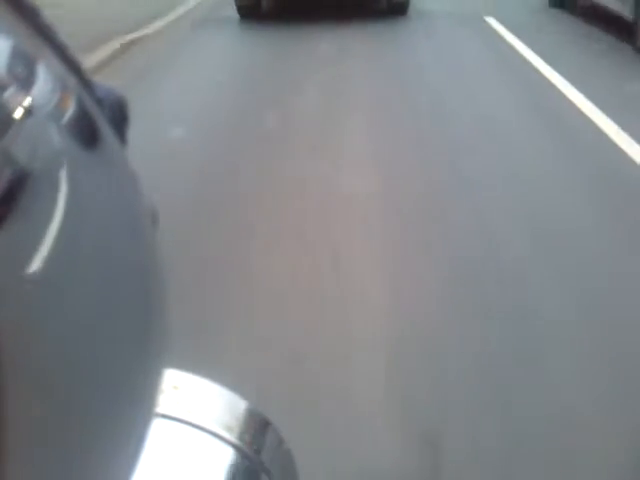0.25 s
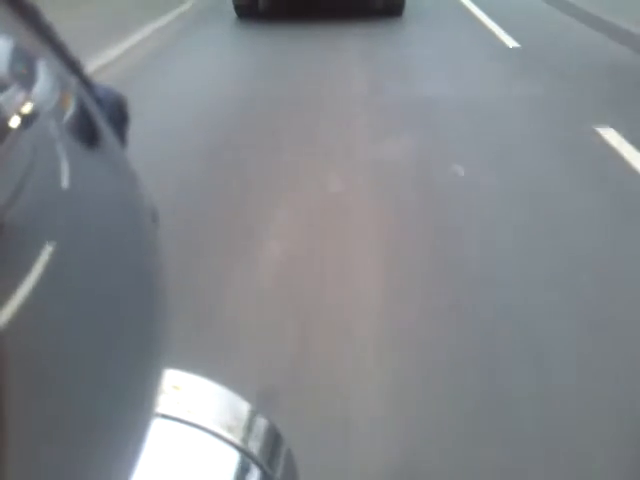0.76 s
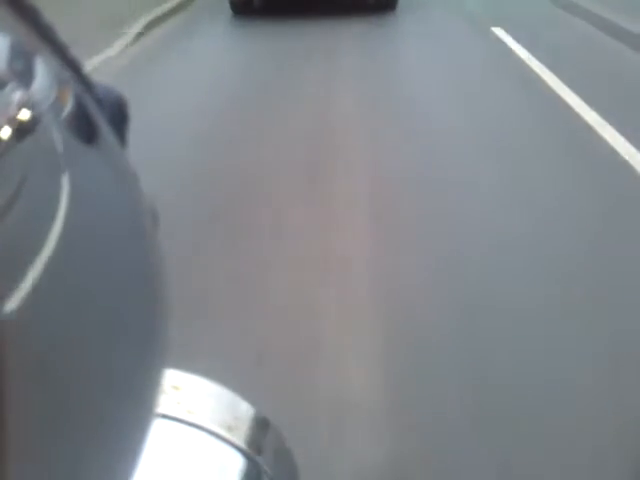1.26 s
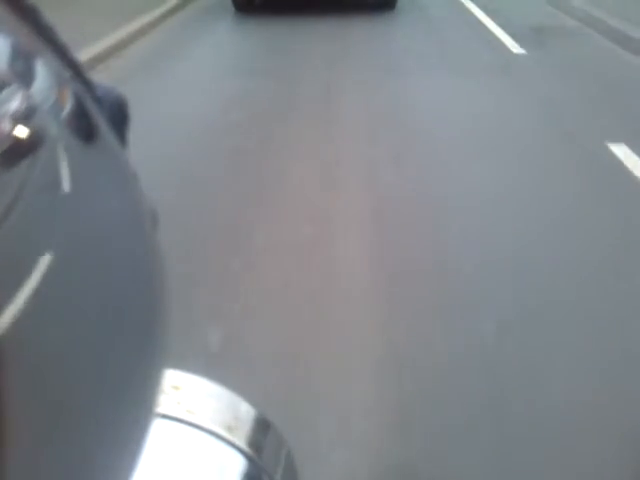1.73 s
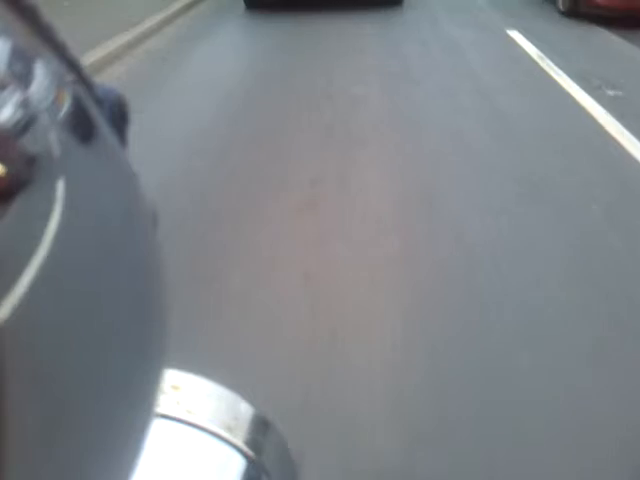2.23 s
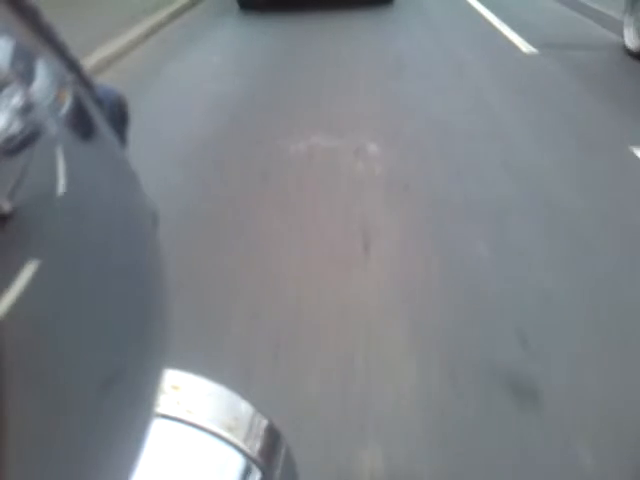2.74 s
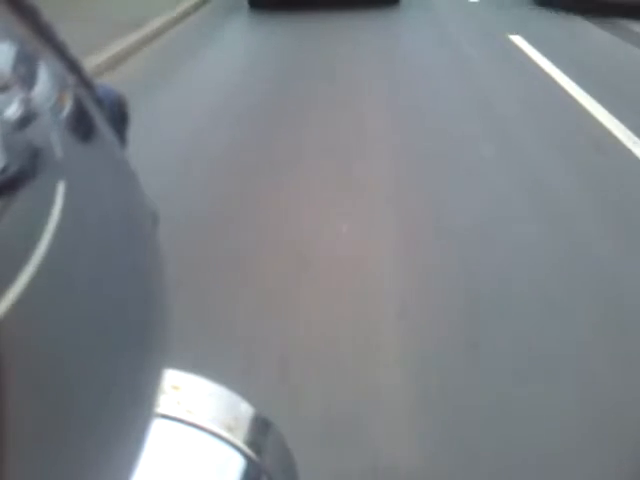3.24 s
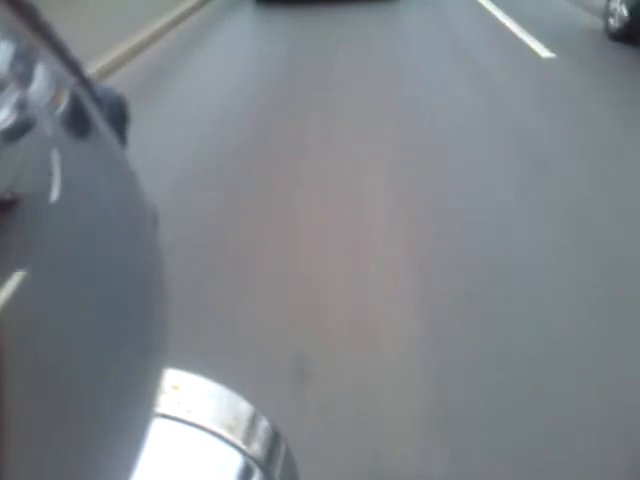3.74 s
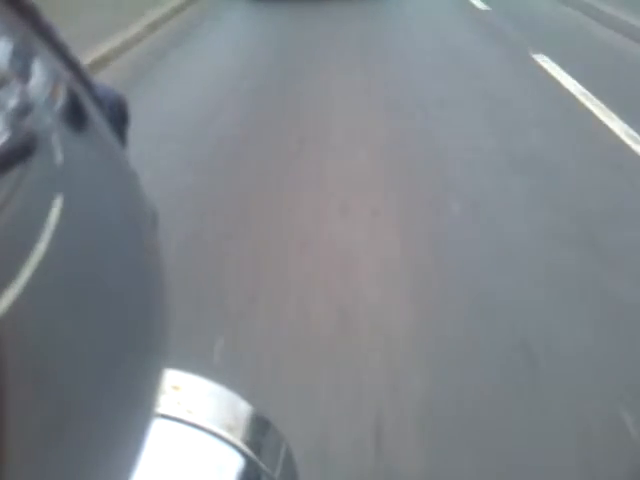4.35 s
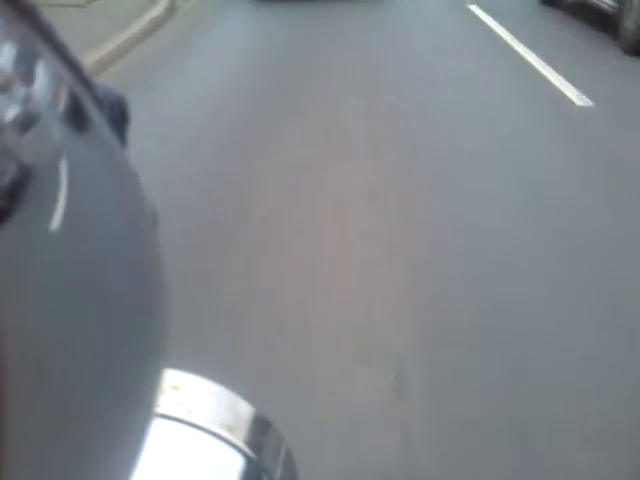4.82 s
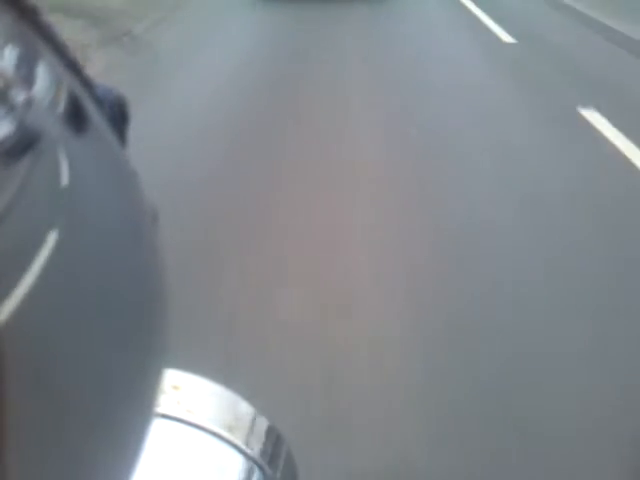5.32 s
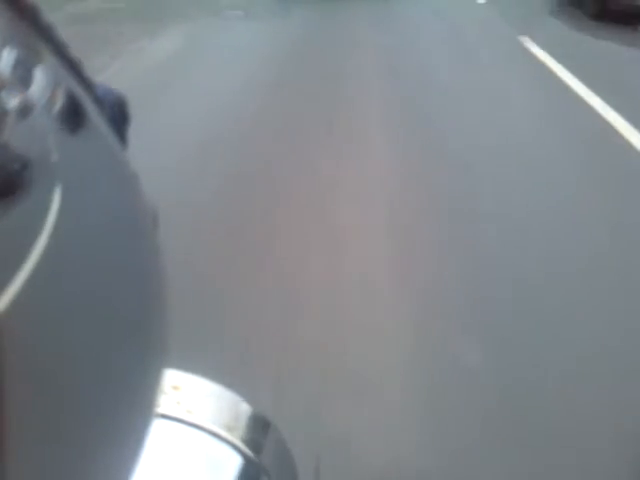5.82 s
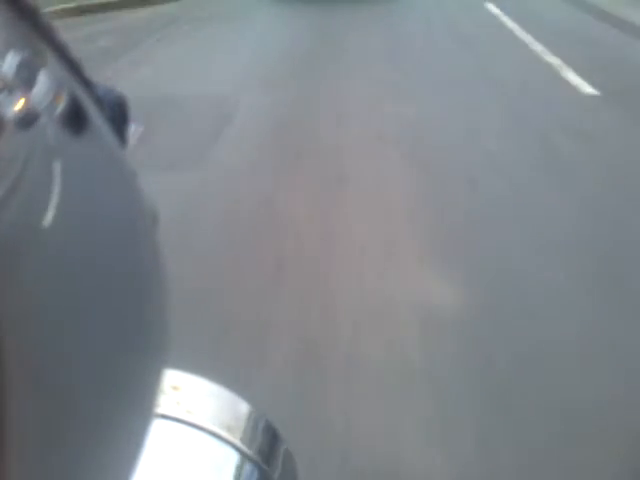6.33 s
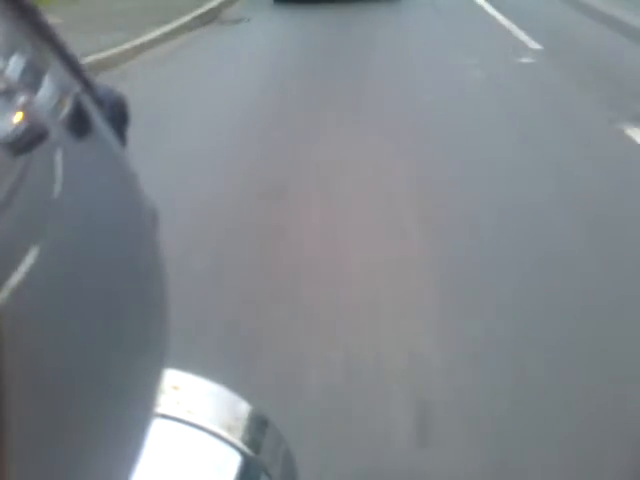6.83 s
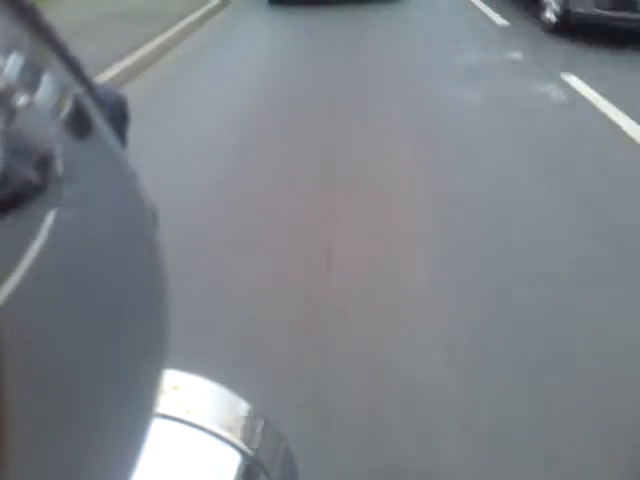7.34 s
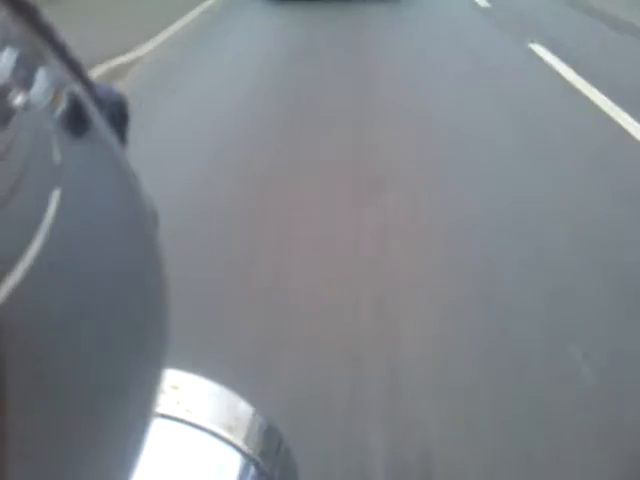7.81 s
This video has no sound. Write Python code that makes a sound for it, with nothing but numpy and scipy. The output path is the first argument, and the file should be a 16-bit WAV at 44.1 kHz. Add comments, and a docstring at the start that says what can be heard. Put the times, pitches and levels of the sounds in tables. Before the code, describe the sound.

On board a motorcycle on a road, a low uneven engine burble rolls along with mechanical clatter and a faint metallic jingle. After about four seconds the throttle opens, the drone smooths and climbs, a gear whine rises with it, and wind increasingly buffets the close microphone, with thumps, knocks and gritty overload near the end.

```python
"""On board a motorcycle

A motorcycle rolls along a road on a light throttle, then pulls harder and gains speed, heard from the bike itself.
Close by, crank orders drone and throb through the exhaust pipe, and a gear whine climbs with the crank.
Filtered noise makes the engine clatter, and short gritty ticks once a turn, as of overload near the waveform's
peaks; decaying sines make a loose metal part jingle. Wind noise buffets the microphone more as the speed rises,
with thumps and knocks; the loudest peaks overload it."""
import sys
import numpy as np
from scipy import signal
from scipy.fft import rfft, irfft, next_fast_len
from scipy.io import wavfile

SR = 44100
rng = np.random.default_rng(int(sys.argv[2]) if len(sys.argv) > 2 else 0)


def file_out(sig):
    """Save sig as 16-bit WAV at sys.argv[1]."""
    # one column per channel
    cols = np.atleast_2d(sig).T
    # limit, then scale
    lim = np.clip(cols, -1, 1)
    pcm = np.round(lim * 32767).astype(np.int16)
    wavfile.write(sys.argv[1], SR, pcm)


N = 355887
TIME = np.arange(N) / SR  # seconds

# Wind at the microphone, growing with speed.
# Each row: crank speed in turns per s, buffeting level in dB, rush level in dB (both before a trim).
WIND_BY_SPEED = [(48.3, -29.5, -42.5), (64.4, -27.5, -42), (81.9, -20.5, -34), (92, -21.5, -38)]
# Gusts. Each row: centre in seconds, half length in seconds, added buffeting in dB, added rush in dB.
GUSTS = [(5.89, 0.12, 6.5, -3), (6.26, 0.056, 8.5, 2.5), (6.41, 0.094, 5.5, 4.5), (6.85, 0.087, 5, 2.5),
         (7.04, 0.084, 7, 8), (7.39, 0.046, 2, 1), (7.6, 0.033, 5, 3), (7.84, 0.062, 7, 4),
         (7.99, 0.044, 2.5, 2)]
# Spectrum of the low buffeting. Each row: frequency in Hz, relative level in dB.
BUFFET_COLOUR = [(12, -17), (28, -10.5), (50, -0.5), (100, 2), (200, 0), (320, -3), (500, -7.5), (800, -14),
                 (1400, -27), (2500, -36.5), (5000, -56.5), (12000, -67)]
# Spectrum of the brighter rush. Each row: frequency in Hz, relative level in dB.
RUSH_COLOUR = [(200, -11), (600, 12.5), (1300, 4), (2000, 0.5), (3000, -5.5), (4000, -14.5), (5000, -24.5),
               (8000, -31), (15000, -50)]
# Jolts and wind thumps. Each row: start in seconds, relative level in dB, pitch in Hz.
THUMPS = [(0.905, -22, 257), (1.36, -10, 245), (1.498, -9, 240), (2.331, -11, 241.7), (2.539, -10.5, 390),
          (2.758, -3, 241.8), (2.772, -7, 467.6), (2.815, -15, 315), (6.974, 0, 263.7), (7.157, 0, 455),
          (7.422, -13, 334), (7.835, -2, 329.2), (7.876, -10, 279.5)]
# Short knocks. Each row: start in seconds, relative level in dB, pitch in Hz.
KNOCKS = [(6.2287, -9, 1203), (6.2613, -20, 1330), (6.3031, -8.5, 1330), (6.4582, -22, 1700),
          (6.973, -9, 1354), (7.017, -17, 1324), (7.0305, -14, 1200), (7.085, -19, 1280),
          (7.1287, -13, 1330), (7.1584, -17.5, 1220), (7.364, -13.5, 1340), (7.735, -20, 1669),
          (7.838, -14, 1270), (7.8774, -21, 1410), (7.98, -16, 1741)]

# Ringing modes of the loose part. Each row: pitch in Hz, relative level in dB, time to fall 60 dB in seconds.
JINGLE_MODES = [(6860, 6, 0.0059), (7500, 0, 0.02), (7750, 6.5, .008), (8540, 4.5, .006),
                (8960, 6.5, 0.007), (10460, -4, .018), (11150, -2, 0.014), (12590, -6, 0.03)]
# Bumps that shake it harder. Each row: centre in seconds, half length in seconds, added level in dB.
JINGLE_BURSTS = [(.03, 0.067, 13), (1.12, 0.027, 4), (2.18, .12, 3.5), (3.2, .3, 3), (3.61, .02, 6),
                 (3.75, 0.031, 10)]
# Spectrum of the sharp overload ticks. Each row: frequency in Hz, relative level in dB.
TICK_COLOUR = [(1000, -4), (3200, 6.5), (5000, -3), (6400, 7), (7200, -15), (7800, 2.5), (8500, -4.5),
               (9700, 2.5), (11000, -14), (15500, -20)]
# Spectrum of the engine clatter and tyre noise. Each row: frequency in Hz, relative level in dB.
CLATTER_COLOUR = [(150, 1), (380, 4.5), (520, -13.5), (700, -3.5), (1050, 1.5), (1600, -5.5), (2100, -14.5),
                  (2800, -13.5), (3600, -18), (4300, -27), (4900, -34), (6100, -32.5), (9500, -33.5),
                  (12000, -38.5), (15500, -45)]
# Resonances of the engine casing. Each row: pitch in Hz, nominal width in Hz, relative level in dB.
CASING = [(683, 29, 4.5), (1267, 73, 2.5), (1341.5, 89, 4), (4220, 160, -23.5)]
# Strength of the gear whine. Each row: time in seconds, level in dB.
WHINE = [(0, -62), (3.3, -45), (4.3, -46.5), (4.9, -41.5), (6.9, -40.5), (7.25, -49), (8.07, -59)]
# Brief flares of the whine. Each row: centre in seconds, half length in seconds, added level in dB.
WHINE_FLARES = [(3.79, .08, 2.5)]

# The rider's hand. Each row: time in seconds, throttle opening 0-1.
THROTTLE = [(0, 0), (.75, 0), (1.3, .2), (2.2, 0.1), (3.7, 0.27), (4.25, 0.5), (5, 0.68), (6.3, .98),
            (7.1, 1), (8.07, 0.63)]
# Crank speed. Each row: time in seconds, turns per s.
SPEED = [(0, 51.2), (.55, 50.4), (.9, 54), (1.55, 57.2), (2.3, 55.4), (3, 54.8), (4, 58.4), (4.9, 63),
         (5.5, 67.5), (6, 72.8), (6.5, 79.6), (7, 87.6), (7.35, 91.2), (7.8, 92), (8.07, 88.6)]
# How firings even out as the throttle opens. Each row: throttle opening 0-1, unevenness 0-1.
UNEVEN = [(.25, 0.83), (.55, .14)]
# Pipe modes rung by uneven firings, a low burble and a hollow ring.
# Each row: pitch in Hz, width in Hz, level in dB, dB added at full throttle, dB added when coasting.
BURBLE = [(138.8, 62, -24, -13.5, 0), (361.5, 63, -37, 1, 6)]
# Resonances of the exhaust pipe. Each row: frequency in Hz, relative level in dB.
PIPE = [(80, -11), (110, -8), (135, 10), (175, 5), (205, -8), (245, 3), (280, -5), (355, -1.5), (390, -7),
        (420, 4), (452, 4.5), (480, -5), (548, 2.5), (640, -10.5), (900, -15.5)]
# The two lowest crank orders. Each row: dB at closed throttle, dB at full throttle.
DRONE = [(-30.5, -22), (-30, -14)]

# the loose part shakes most near one crank speed (turns per s)
SHAKE_SPEED, SHAKE_SPEED_WIDTH = 55.9, 4.1
JINGLE_DB, JINGLE_SHAKE_DB = -79.5, 16  # far from that speed, and added at it
TICK_DB, TICK_LOAD_DB = -68.5, 5  # at closed throttle, and added at full throttle
# around this crank speed (turns per s) the ticks step up in level
TICK_ONSET_SPEED, TICK_ONSET_WIDTH, TICK_FAST_DB = 74, 1.2, 10
CLATTER_DB, CLATTER_LOAD_DB = -38, 2.5  # before trims: at closed throttle, and added at full throttle
MESH_ORDER = 21.6  # whine cycles per crank turn
WHINE_PEAK_HZ, WHINE_PEAK_WIDTH_HZ, WHINE_PEAK_DB = 1363, 170, 9  # the casing favours this pitch
COAST_BELOW = 0.11  # throttle opening by which coasting has faded to about a third
EXHAUST_DB, EXHAUST_LOAD_DB = -36.5, 11  # before the pipe: at closed throttle, and added at full throttle
BOOM_HZ, BOOM_WIDTH_HZ, BOOM_DB = 75.4, 9.9, 5  # the first order booms as it passes this pitch
EDGE_HZ = 15800  # upper band limit


def amp(db):
    """Decibels to gain."""
    return 10 ** (np.asarray(db) / 20)


def unit(x):
    """Scales to rms 1."""
    return x / np.sqrt(np.mean(x ** 2) + 1e-20)


def curves(rows):
    """Each column of a table after the time, at every sample."""
    s, *columns = np.transpose(rows)
    return [np.interp(TIME, s, column) for column in columns]


def bell(x, centre, width):
    """A smooth hump of height 1."""
    return np.exp(-((x - centre) / width) ** 2)


def swells(rows):
    """Brief humps of level from rows of (s, half length s, dB, ..): one curve for each dB column."""
    return sum(np.outer(dbs, bell(TIME, s, half)) for s, half, *dbs in rows)


def noise():
    """White noise."""
    return rng.standard_normal(N)


def wander(rate_hz):
    """Slow random curve of rms 1, fading out above roughly the given rate."""
    points, points_per_s = 16384, 1500
    f = np.fft.rfftfreq(points, 1 / points_per_s)
    slow = irfft(rfft(rng.standard_normal(points)) * np.exp(-(f / rate_hz) ** 2))
    return unit(np.interp(TIME, np.arange(points) / points_per_s, slow))


def colour(x, points):
    """Filters by a spectrum of (Hz, dB) points; rms 1."""
    hz, db = np.transpose(points)
    size = next_fast_len(N)
    f = np.fft.rfftfreq(size, 1 / SR)
    gain = amp(np.interp(np.log(f + 1), np.log(hz), db))
    return unit(irfft(rfft(x, size) * gain, size)[:N])


def band(x, low_hz, high_hz):
    """A band-pass filter."""
    return signal.sosfilt(signal.butter(2, [low_hz, high_hz], "band", fs=SR, output="sos"), x)


def resonate(x, hz, width):
    """A resonance of gain 1 that can follow a pitch curve: shift down to zero, smooth, shift back."""
    turn = np.exp(2j * np.pi * np.cumsum(hz * np.ones(N)) / SR)
    r = np.exp(-np.pi * width / SR)
    return 2 * (turn * signal.lfilter([1 - r], [1, -r], x / turn)).real


def resonate_twice(x, hz, width):
    """Two equal resonances in a row, for steeper skirts."""
    return resonate(resonate(x, hz, width), hz, width)


def once_a_turn(turns):
    """A unit click at each whole turn."""
    return np.diff(np.floor(turns), prepend=np.floor(turns[0]))


def per_turn(turns):
    """A normal random value held for each turn."""
    return rng.standard_normal(1000)[np.floor(turns).astype(int) % 1000]


def add(mix, s, sound):
    """Mixes a sound in at a time."""
    part = mix[max(round(s * SR), 0):][:len(sound)]
    part += sound[:len(part)]


def unevenness(throttle):
    """How much the firings differ from each other, 0-1."""
    return np.clip(np.interp(throttle, *np.transpose(UNEVEN)), 0, 1)


def coasting(throttle):
    """1 with the throttle shut, falling smoothly towards 0 as it opens."""
    return bell(throttle, 0, COAST_BELOW)


def pipe_level(hz, throttle):
    """Level in dB of an exhaust order: louder with the throttle, coloured by the pipe."""
    return EXHAUST_DB + EXHAUST_LOAD_DB * throttle + np.interp(hz, *np.transpose(PIPE))


def wind(turns, speed, buffet_db=2, rush_db=4, lumps_db=2.0, crackle_db=5.5, throb_db=3.5, onset_db=-43,
         pops=0.36, pops_per_s=110):
    """Eddies buffet the microphone; strong wind tears into a brighter, crackling rush that throbs with the engine."""
    speeds, *steady_db = np.transpose(WIND_BY_SPEED)
    low_db, high_db = [np.interp(speed, speeds, db) for db in steady_db] + swells(GUSTS)
    eddies = wander(60)
    buffet = colour(noise() * amp(lumps_db * eddies), BUFFET_COLOUR)
    grain_db = crackle_db * 2 * np.tanh((.5 * eddies + wander(380)) / 2)
    grain_db = grain_db + throb_db * np.cos(2 * np.pi * (turns + 0.31))
    crackle = unit(np.tanh(noise()) * (rng.random(N) < pops_per_s / SR))
    rush = colour(unit(noise() * amp(grain_db)) + pops * crackle, RUSH_COLOUR)
    # only wind above a threshold tears
    strength = np.sqrt(np.maximum(amp(high_db) ** 2 - amp(onset_db) ** 2, 0))
    return amp(low_db + buffet_db) * buffet + amp(rush_db) * strength * rush


def jolts(thump_db=-3, knock_db=-6, knock_s=0.0011, cycles=0.28):
    """Low thumps are quickly dying sines; short knocks are pulses of band-passed noise."""
    out, t = np.zeros(N), TIME[:SR // 20]
    for s, db, hz in THUMPS:
        u = t * hz / cycles  # the envelope peaks at u = 1
        add(out, s, -amp(db + thump_db) * u * np.exp(1 - u) * np.sin(2 * np.pi * hz * t))
    for s, db, hz in KNOCKS:
        u = t / knock_s
        grit = unit(band(rng.standard_normal(len(t)), hz * 0.61, hz * 1.28))
        add(out, s, amp(db + knock_db) * grit * u * np.exp(1 - u))
    return out


def overload_ticks(turns, speed, throttle, length=0.087, scatter_db=5.0, lead=0.2):
    """A short gritty noise burst once a turn near the waveform's peak, as of overload (length and lead in turns)."""
    fast = 1 / (1 + np.exp((TICK_ONSET_SPEED - speed) / TICK_ONSET_WIDTH))
    db = TICK_DB + TICK_LOAD_DB * throttle + TICK_FAST_DB * fast
    phase = turns + lead
    bursts = np.exp(-(phase % 1) / length) * amp(scatter_db * np.tanh(per_turn(phase)))
    return amp(db) * colour(noise() * bursts, TICK_COLOUR)


def jingle(turns, speed, scatter_db=3, bounce=.5, bounces_per_s=90):
    """Shaken by the crank, the loose part strikes about once a turn and bounces at random, each ring different."""
    shaking = 1 / (1 + ((speed - SHAKE_SPEED) / SHAKE_SPEED_WIDTH) ** 2)
    db = JINGLE_DB + JINGLE_SHAKE_DB * shaking + swells(JINGLE_BURSTS)[0]
    strike_gain = amp(scatter_db * np.clip(per_turn(turns + .5), -2, 2))
    strikes = once_a_turn(turns + 0.071 * wander(40)) * strike_gain  # with uneven timing
    strikes = strikes + bounce * noise() * (rng.random(N) < bounces_per_s / SR)
    t = TIME[:SR // 20]
    attack = 1 - np.exp(-t / .0004)
    ring = np.zeros(N)
    for hz, level, t60 in JINGLE_MODES:
        mode = attack * amp(level - 60 * t / t60) * np.sin(2 * np.pi * hz * t)
        ring += signal.oaconvolve(strikes * (1 + .5 * noise()), mode)[:N]
    return amp(db) * unit(ring)


def clatter(turns, throttle, throb=0.13, flutter_db=0.97, body_db=3, casing_db=-1.5, casing_load_db=3, flare_db=2.5):
    """Dense mechanical noise swells each turn; more noise rings the casing in short flares."""
    db = CLATTER_DB + CLATTER_LOAD_DB * throttle
    drive = noise() * (1 + throb * np.cos(2 * np.pi * turns)) * amp(flutter_db * wander(70))
    body = amp(body_db) * colour(drive, CLATTER_COLOUR)
    shake = noise() * amp(flare_db * wander(22))
    casing = sum(amp(level) * resonate_twice(shake, hz, 1.28 * width) for hz, width, level in CASING)
    return amp(db) * (body + amp(casing_db + casing_load_db * throttle) * unit(casing))


def gears(speed, width_hz=90, octave_width_hz=170, pure=0.7, octave_db=-10):
    """Tooth meshing gives a whine that climbs with the crank: a thin core in a fuzzy band, and a weak octave."""
    db, = curves(WHINE)
    mesh_hz = MESH_ORDER * speed
    lift_db = WHINE_PEAK_DB * bell(mesh_hz, WHINE_PEAK_HZ, WHINE_PEAK_WIDTH_HZ) + swells(WHINE_FLARES)[0]
    core = np.sqrt(2) * np.sin(2 * np.pi * np.cumsum(mesh_hz + 12 * wander(39.8)) / SR)
    fuzz = unit(resonate_twice(noise(), mesh_hz, width_hz))
    octave = unit(resonate_twice(noise(), 2 * mesh_hz, octave_width_hz))
    return amp(db) * (amp(lift_db) * unit(fuzz + pure * core) + amp(octave_db) * octave)


def burble(turns, throttle):
    """Firings of random strength and timing ring two modes of the pipe."""
    firings = once_a_turn(turns + .08 * wander(40.8)) * np.tanh(per_turn(turns + .5))
    out = np.zeros(N)
    for hz, width, db, load_db, coast_db in BURBLE:
        level = db + load_db * throttle + coast_db * coasting(throttle)
        out += amp(level) * unit(band(firings, hz - width / 2, hz + width / 2))
    return out


def exhaust(turns, speed, throttle, half_db=-8, top_order=5.4, ragged_hz=26):
    """The higher orders sweep through the pipe's resonances; uneven firings smear them on a light throttle."""
    uneven = unevenness(throttle)
    out = np.zeros(N)
    for k in np.r_[1.5, 2.5, np.arange(3.5, 9.5, .5)]:
        # a four-stroke repeats every two turns, which gives weaker half orders
        level = pipe_level(k * speed, throttle) + (half_db if k % 1 else 0)
        angle = 2 * np.pi * (k * turns + rng.random())
        ragged = wander(ragged_hz) * np.cos(angle) + wander(ragged_hz) * np.sin(angle)
        line = np.sqrt(2 * (1 - uneven)) * np.cos(angle) + np.sqrt(uneven) * ragged
        out += amp(level) / (1 + (k / top_order) ** 4) * line
    return out


def drone(turns, speed, throttle, third_db=0.5, coast_db=3, waver_db=1.0, lope=0.79):
    """The three lowest crank orders are near sines that peak together; on a light throttle the third
    lopes every two turns."""
    first_db, second_db = (closed + (full - closed) * throttle for closed, full in DRONE)
    levels_db = (first_db + BOOM_DB * bell(speed, BOOM_HZ, BOOM_WIDTH_HZ),
                 second_db - coast_db * coasting(throttle),
                 pipe_level(3 * speed, throttle) + third_db + coast_db * coasting(throttle))
    first, second, third = (np.sqrt(2) * amp(db + waver_db * wander(13)) * np.cos(2 * np.pi * k * turns)
                            for k, db in enumerate(levels_db, 1))
    return first + second + third * (1 + lope * unevenness(throttle) * np.cos(np.pi * turns))


def scene():
    """Crank speed and throttle drive the engine sounds and the ticks; wind and jolts lie over them."""
    (speed,), (throttle,) = curves(SPEED), curves(THROTTLE)
    turns = np.cumsum(speed) / SR
    air = wind(turns, speed) + jolts()
    overload = overload_ticks(turns, speed, throttle)
    metal = jingle(turns, speed) + clatter(turns, throttle) + gears(speed)
    pipe = burble(turns, throttle) + exhaust(turns, speed, throttle) + drone(turns, speed, throttle)
    return (air + overload + metal + pipe)[None]


def record(dry):
    """The microphone flattens the highest peaks; then come tiny end fades and the band limit."""
    clipped = dry / (1 + (dry / .73) ** 8) ** (1 / 8)
    faded = clipped * signal.windows.tukey(N, .001)
    low_pass = signal.firwin(511, EDGE_HZ, window=("kaiser", 9), fs=SR)
    return signal.oaconvolve(faded, low_pass[None], "same")


dry = scene()
out = record(dry)
file_out(out)
```